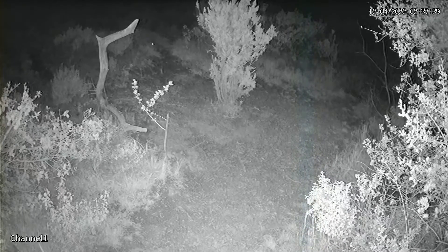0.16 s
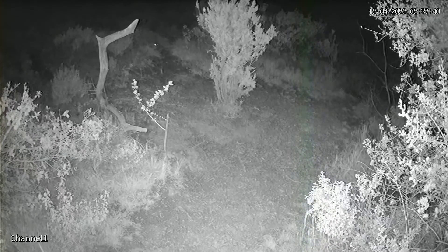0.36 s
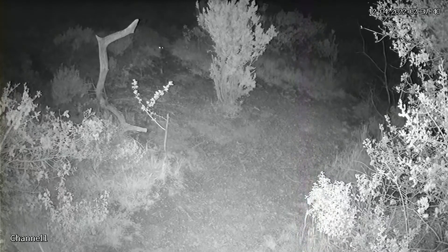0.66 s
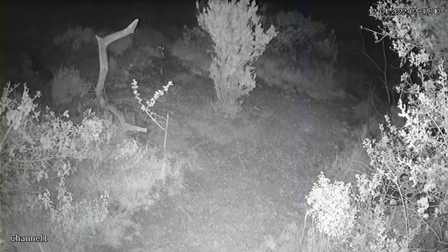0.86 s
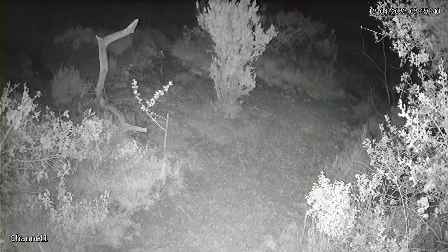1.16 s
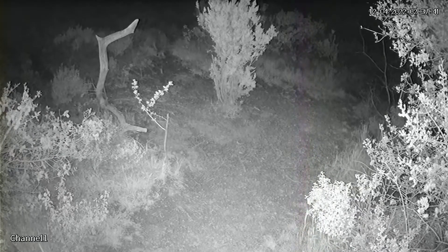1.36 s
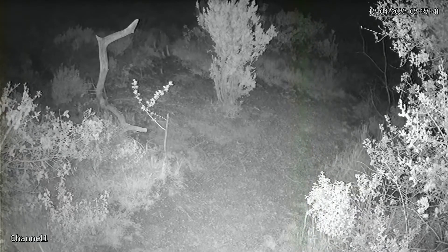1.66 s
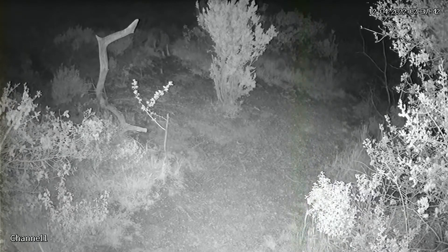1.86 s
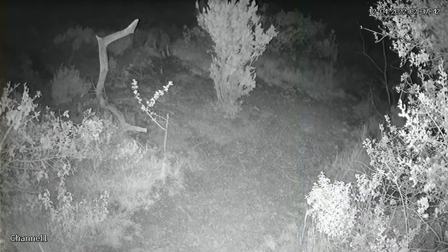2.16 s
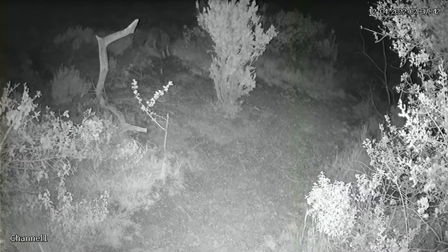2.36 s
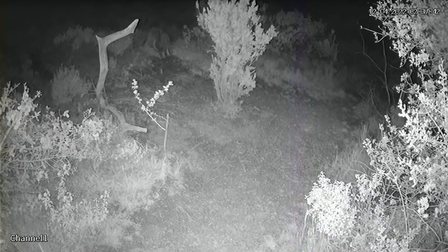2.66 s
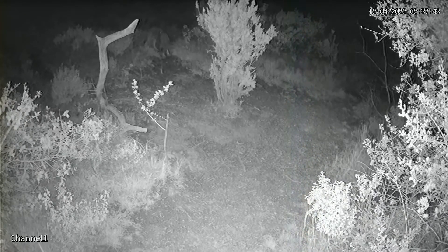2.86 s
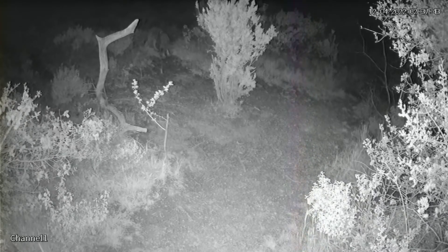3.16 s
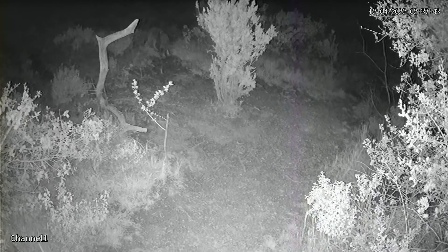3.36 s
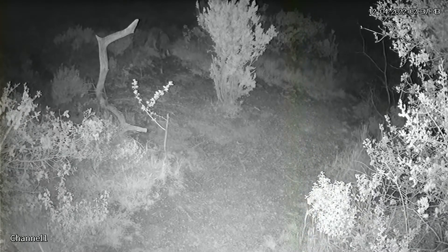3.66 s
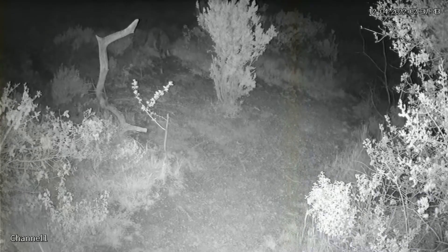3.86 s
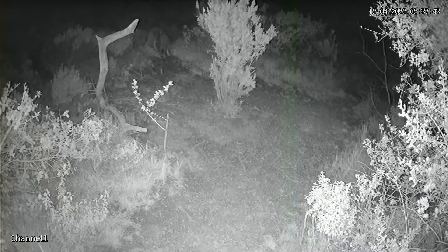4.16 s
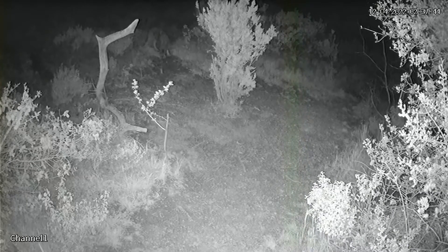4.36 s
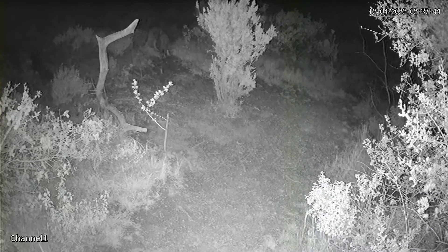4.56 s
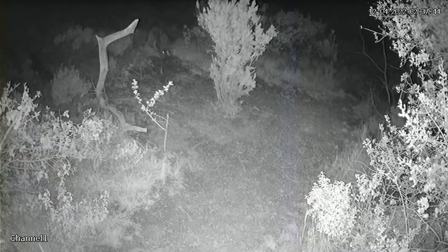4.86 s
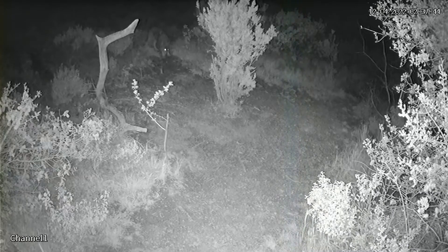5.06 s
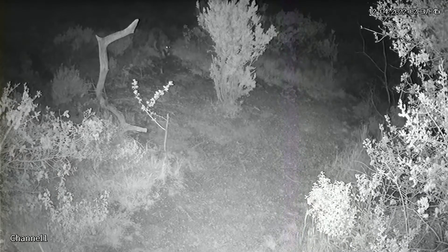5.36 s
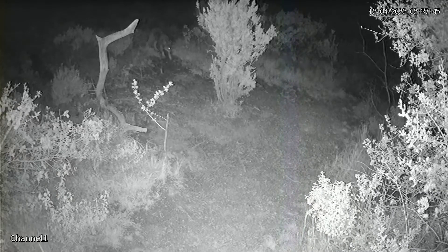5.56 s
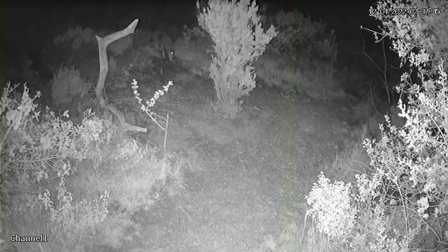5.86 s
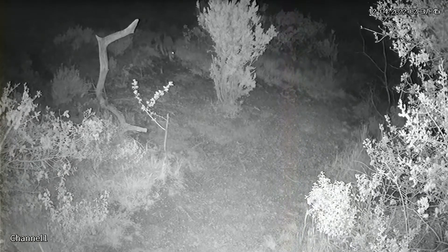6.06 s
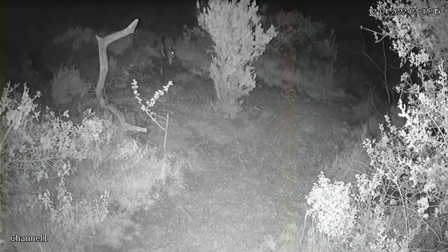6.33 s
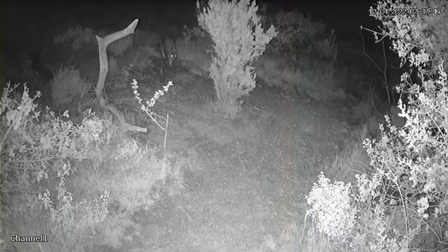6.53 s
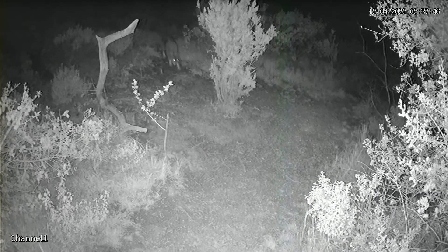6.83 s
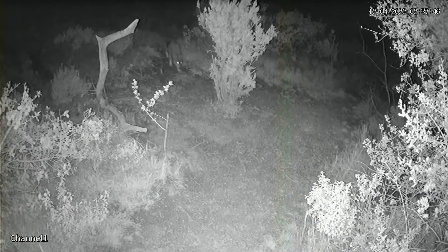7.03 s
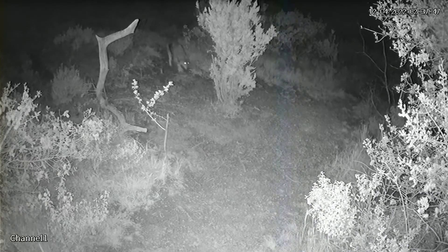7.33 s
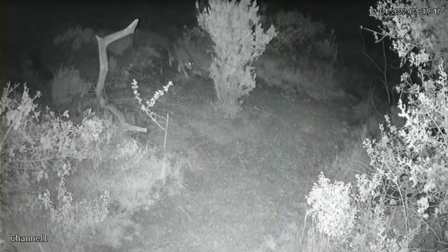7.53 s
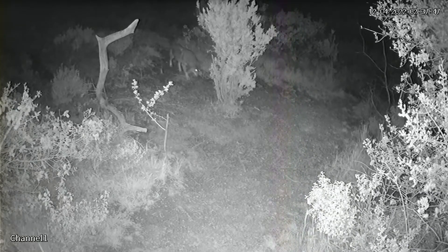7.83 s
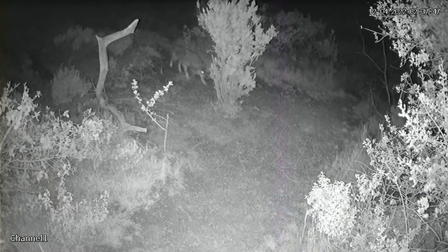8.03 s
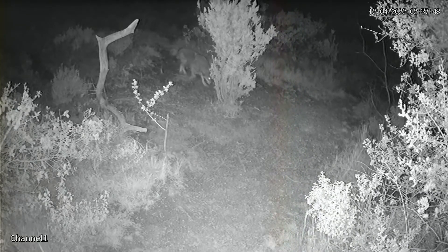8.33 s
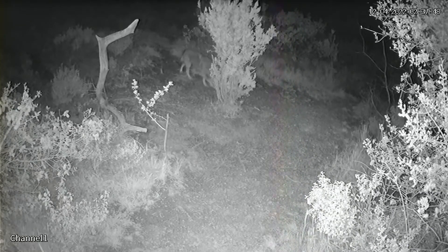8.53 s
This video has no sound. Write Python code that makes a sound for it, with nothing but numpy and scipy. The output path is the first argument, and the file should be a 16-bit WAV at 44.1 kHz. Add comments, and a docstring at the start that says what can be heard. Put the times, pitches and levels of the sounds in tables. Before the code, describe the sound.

In still, open scrub at night, two owls call to each other. The first hoots twice, low and pure, each note scooping up, holding and sagging. Following a pause, a higher, slightly louder owl replies with five hoots in an uneven rhythm. Both sound dry and centred at the microphone. All around them, a little stronger on the left, insects keep up a bright, pulsing hiss over barely audible air.

```python
"""Two owls and night insects

In dry open scrub a low owl gives two hoots and a higher one answers with a run of five. Each hoot is a
nearly pure tone from a swollen throat that scoops up, holds and sags. A chorus of insects throbs about
six times a second throughout, its clicks merging into a hiss, over faint air and a very faint hum."""
import sys
import numpy as np
from scipy import signal
from scipy.fft import rfft, irfft, next_fast_len
from scipy.io import wavfile
from scipy.ndimage import uniform_filter1d

SR = 44100
rng = np.random.default_rng(int(sys.argv[2]) if len(sys.argv) > 2 else 0)


def store_wav(level_fs):
    """Save 16-bit WAV to argv[1]."""
    pcm = np.round(np.clip(np.atleast_2d(level_fs), -1, 1) * 32767)
    wavfile.write(sys.argv[1], SR, pcm.T.astype(np.int16))


N = 383229


# Each owl's hoots: start_s, length_s, top_pitch_hz, hold (2 sags at once, 12 sags late), level_db
LOW_OWL_HOOTS = [(0.543, 0.41, 309, 12.3, -32.5), (1.262, 0.34, 310.4, 10.6, -32.5)]
HIGH_OWL_HOOTS = [(6.028, 0.22, 367.8, 3, -32), (6.405, 0.22, 369.4, 3.6, -30.5),
                  (6.603, 0.42, 379.5, 14.1, -28.5), (7.307, 0.37, 383.1, 10.5, -27.5),
                  (7.771, 0.28, 369.7, 6.0, -29.5)]
# Overtones in full voice, before the throat shapes them: pitch_multiple, level_db
LOW_OWL_OVERTONES = [(2, -53.5), (3, -80), (4, -81)]
HIGH_OWL_OVERTONES = [(2, -56), (3, -82), (4, -79.5)]

def owls():
    """The low owl calls and the higher one answers."""
    call = owl_voice(LOW_OWL_HOOTS, LOW_OWL_OVERTONES, db_per_octave=48, full_voice_db=-40.5)
    answer = owl_voice(HIGH_OWL_HOOTS, HIGH_OWL_OVERTONES, db_per_octave=44.5, full_voice_db=-57)
    return call + answer


# The closed beak muffles the overtones except at one windpipe resonance: frequency_hz, gain_db
THROAT_EQ = [(850, -0.5), (1150, -4), (1360, -5), (1480, 3.5), (1600, -9)]

def owl_voice(hoots, overtones, db_per_octave, full_voice_db, waver=.0035, rough_db=.11, flicker_db=2.02):
    """The swollen throat boosts the fundamental near the top of a hoot; weak overtones level off early."""
    pitch, loudness = hoot_phrase(hoots, db_per_octave)
    pitch = pitch * (1 + waver * wander(60))
    loudness = loudness * undb(rough_db * wander(300))
    phase = phase_of(pitch)
    voice = loudness * np.sin(phase)
    for k, db in overtones:
        # the higher the overtone, the more voice it needs and the less steady it is
        drive = np.tanh(loudness / undb(full_voice_db + 3 * (k - 3.5)))
        flicker = flicker_db * (k - 1.5) * wander(25)
        throat_db = np.interp(k * pitch, *np.transpose(THROAT_EQ))
        voice = voice + drive * undb(db + throat_db + flicker) * np.sin(k * phase)
    return np.sqrt(2) * voice


# The voice slackens briefly within a hoot: centre_s, pitch_drop_hz, width_s
VOICE_CATCHES = [(0.65, 4.3, 0.1), (0.841, 11, 0.028), (6.767, 66, 0.067), (6.9, 3, 0.04),
                 (7.472, 20, 0.185)]

def hoot_phrase(hoots, db_per_octave, slack_hz=181.4, fade_in_s=.031, fade_out_s=.036, edge_drop=.36):
    """Pitch and loudness of the hoots: the higher the voice climbs from slack, the louder it is."""
    t = np.arange(N) / SR
    pitch, loudness = np.full(N, slack_hz), np.zeros(N)
    catch_hz = sum(drop * np.exp(-(2 * (t - at) / width) ** 2) for at, drop, width in VOICE_CATCHES)
    for start, length, top_hz, hold, db in hoots:
        on = (t > start) & (t < start + length)
        age = t[on] - start
        hz = slack_hz + (top_hz - slack_hz) * voice_tension(age, length, hold) - catch_hz[on]
        edge = np.minimum(age / fade_in_s, (length - age) / fade_out_s)
        fade = np.sin(np.pi / 2 * np.minimum(edge, 1))
        loudness[on] = fade * undb(db + db_per_octave * np.log2(hz / top_hz))
        pitch[on] = hz * (1 - edge_drop * (1 - fade ** 2))  # lower still as the voice starts and dies
    return pitch, loudness


def voice_tension(age, length, hold, scoop_s=.037, scoop_power=1.61):
    """Tension through one hoot, 0-1: a quick scoop up, a hold, a sag."""
    scoop = 1 - np.exp(-(age / scoop_s) ** scoop_power)
    sag = (1 - (age / length) ** hold) ** 2
    return scoop * sag / np.max(scoop * sag)


def insect_chorus(chorus_db=-36, size_spread=.012, tilt_db=1, trade=.26, flutter_db=.75):
    """Larger, duller insects and smaller, brighter ones trade the lead while the chorus throbs."""
    lead = np.pi / 4 + trade * wander(14)
    large = insect_group(1 - size_spread, -tilt_db)
    small = insect_group(1 + size_spread, tilt_db)
    blend = np.cos(lead) * large + np.sin(lead) * small
    left, right = blend * chirp_throb() * undb(flutter_db * wander(35))
    return level(np.array([lag_left(left), right]), chorus_db)


# Broad ring of the insects' bodies: frequency_hz, gain_db
BODY_EQ = [(400, -50), (1060, -38), (1900, -34), (2330, -16), (3150, -15.5), (3750, -22), (4550, -1),
           (5750, 1), (6150, -7), (7800, -9.5), (9600, -22.5), (11200, -25), (13000, -35), (15000, -45)]
# Narrow peaks and a notch on top of it: centre_hz, width_hz, gain_db
BODY_RINGS = [(4629, 62, 6), (5770, 66, -4.5), (6970, 260, 2.5)]
# Where the chorus sits in the stereo field: frequency_hz, left_minus_right_db
CHORUS_PAN = [(2400, 3), (4500, 5), (5900, 4), (6900, 0), (8000, -2), (10500, -3), (14000, -0.5)]

def insect_group(body_shift, tilt_db, click_db=-4, scattered_db=2.5):
    """The nearest insect clicks distinctly; the rest merge into hiss, partly scattered by the bushes."""
    direct = undb(click_db) * insect_clicks() + rng.standard_normal(N)
    hz = np.arange(1025) * SR / 2048
    rings = sum(db / (1 + (2 * (hz - centre) / width) ** 2) for centre, width, db in BODY_RINGS)
    brightness = tilt_db * np.log2(np.maximum(hz, 2000) / 5000)
    body = curve_at_bins(BODY_EQ, size=2048, shift=body_shift) + rings + brightness
    pan = curve_at_bins(CHORUS_PAN, size=2048)
    left, right = direct + undb(scattered_db) * rng.standard_normal((2, N))
    return np.array([colour(left, body + pan / 2), colour(right, body - pan / 2)])


def insect_clicks(click_hz=216.75, drift=.015, jitter_cycles=.04, scatter_db=1.9):
    """One insect's sound organ snaps a couple of hundred times a second, never quite evenly."""
    cycles = np.cumsum(click_hz * (1 + drift * wander(9))) / SR
    at = np.flatnonzero(np.diff(np.floor(cycles)))
    timing, strength = rng.standard_normal((4000, 2))[:len(at)].T
    at = np.clip(at + (jitter_cycles * timing * SR / click_hz).astype(int), 0, N - 1)
    return level(np.bincount(at, undb(scatter_db * strength), N), 0)


# Bouts of chirping in step: start_s, chirp_rate_hz, chirp_count, throb_depth (0-1), gain_db
CHIRP_BOUTS = [(0.26, 6.0, 2, 0.66, -0.9), (0.6, 6.0, 6, 0.34, -0.7), (1.643, 5.43, 5, 0.62, 0),
               (2.51, 5.6, 2, 0.22, -0.2), (2.89, 6.2, 4, 0.7, 0), (3.593, 5.48, 3, 0.6, 0.1),
               (4.121, 5.38, 4, 0.68, 0.2), (4.876, 5.2, 2, 0.28, -0.3), (5.22, 5.94, 6, 0.56, 0.1),
               (6.276, 5.88, 5, 0.45, 0.2), (7.087, 7.6, 7, 0.25, 0.3), (8.025, 5.72, 5, 0.4, 0.2)]

def chirp_throb(squareness=.64):
    """The insects chirp evenly through each bout; the closer their unison, the deeper the throb."""
    t = np.arange(N) / SR
    chirps = [(start + k / rate, depth, db)
              for start, rate, count, depth, db in CHIRP_BOUTS for k in range(count)]
    peaks_s, depths, gains_db = np.transpose(chirps)
    lead_in_s = 2 * peaks_s[0] - peaks_s[1]
    cycle = np.interp(t, np.r_[lead_in_s, peaks_s], np.arange(len(peaks_s) + 1))
    throb = np.tanh(squareness * np.cos(2 * np.pi * np.maximum(cycle, .5))) / np.tanh(squareness)
    depth = np.interp(t, np.r_[0, peaks_s], np.r_[depths[0] / 2, depths])
    return np.sqrt(np.maximum(1 + depth * throb, 0)) * undb(np.interp(t, peaks_s, gains_db))


# How far the chorus's left side trails its right: frequency_hz, lag_rad
LEFT_LAG = [(3000, 0.74), (4300, 1.4), (6500, 0.81), (8500, 1.11), (10200, 0.092), (12500, 0)]

def lag_left(left):
    """Hold the left side back by a phase that depends on frequency."""
    size = next_fast_len(N, True)
    return irfft(rfft(left, size) * np.exp(-1j * curve_at_bins(LEFT_LAG, size)), size)[:N]


def branch_echoes(x, echo_db=-15, spread_s=.012, count=14):
    """Nearby trunks and twigs return a few faint early echoes that ripple the treble."""
    delays = (SR * spread_s * rng.uniform(.1, 1, count)).astype(int)
    taps = np.bincount(delays, rng.choice([-1., 1.], count)) * undb(echo_db) / np.sqrt(count)
    taps[0] = 1
    return signal.fftconvolve(x, taps)[:N]


# Tone of the still night air: frequency_hz, gain_db
AIR_EQ = [(15, -44), (30, -12.5), (60, -5), (125, -4.5), (145, -9.5), (190, -6), (240, -4), (330, -9),
          (410, -10), (470, -4.5), (560, -8), (1800, -10.5), (2400, -34.5)]

def night_air(air_db=-75.5, wide_above_hz=1300):
    """A faint even rush, centred in the bass and wide higher up."""
    tone_db = curve_at_bins(AIR_EQ, size=8192)
    mid, side = (colour(rng.standard_normal(N), tone_db) for _ in range(2))
    side = signal.sosfilt(signal.butter(2, wide_above_hz, "high", fs=SR, output="sos"), side)
    return np.array([mid + side, mid - side]) * undb(air_db) / np.std(mid)


# Fader moves on the hum's upper tone: time_s, level_db
MURMUR_FADER = [(0, -84.5), (3.5, -84), (6, -87.5), (8.69, -87.5)]

def distant_hum(hum_hz=106.3, hum_db=-84.5, partner_db=-9, beat_hz=.9, lull_s=4.66,
                murmur_hz=204, waver=.035, flutter_db=2.2):
    """Two close low tones beat slowly; a third, about an octave up, wavers into a murmur."""
    t = np.arange(N) / SR
    phase = 2 * np.pi * hum_hz * t
    beat = 2 * np.pi * beat_hz * (t - lull_s)
    drone = undb(hum_db) * (np.sin(phase) - undb(partner_db) * np.sin(phase + beat))
    murmur_db = np.interp(t, *np.transpose(MURMUR_FADER)) + flutter_db * wander(22)
    murmur = undb(murmur_db) * np.sin(phase_of(murmur_hz * (1 + waver * wander(30))))
    return np.sqrt(2) * (drone + murmur)


def undb(db):
    """Decibels to gain."""
    return 10 ** (np.asarray(db) / 20)


def level(x, db):
    """Scale to an rms level."""
    return x * undb(db) / np.sqrt(np.mean(x ** 2))


def wander(rate_hz):
    """Smooth random drift, rms 1, that changes about rate_hz times a second."""
    steps = rng.standard_normal(N)[(np.arange(N) * rate_hz / SR).astype(int)]
    size = int(SR / rate_hz)
    return level(uniform_filter1d(uniform_filter1d(steps, size), size), 0)


def phase_of(hz):
    """Phase in radians of a moving pitch."""
    return 2 * np.pi * np.cumsum(hz) / SR


def curve_at_bins(points, size, shift=1):
    """A curve of (frequency_hz, value) at the bins of an FFT; shift scales its frequencies."""
    hz, value = np.transpose(points)
    bin_hz = np.arange(size // 2 + 1) * SR / size
    return np.interp(np.log(bin_hz + 1), np.log(hz * shift), value)


def colour(x, db):
    """Minimum-phase EQ with the given gain per bin, so a click rings after it and not before."""
    cepstrum = irfft(np.log(undb(db)))
    half = len(cepstrum) // 2
    cepstrum[1:half] *= 2
    cepstrum[half + 1:] = 0
    return signal.fftconvolve(x, irfft(np.exp(rfft(cepstrum))))[:N]


def scene():
    """Open ground leaves no reverb tail; the owls sit in the centre, the insects lean to the left."""
    hoots = owls()
    chorus = np.array([branch_echoes(side) for side in insect_chorus()])
    return hoots + chorus + night_air() + distant_hum()


def record(dry):
    """A steep low-pass cuts the very top."""
    top_hz = 15100
    return signal.sosfilt(signal.ellip(10, .2, 80, top_hz, fs=SR, output="sos"), dry)


dry = scene()
out = record(dry)
store_wav(out)
```